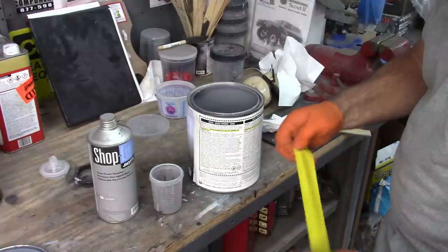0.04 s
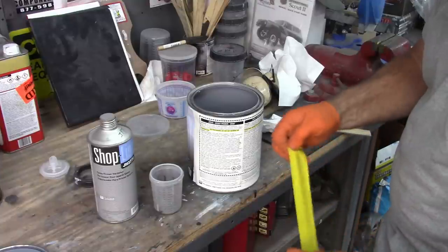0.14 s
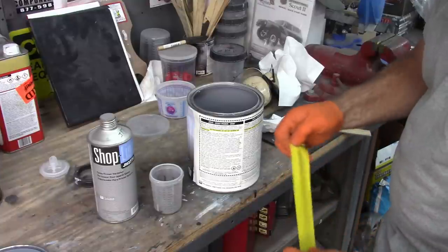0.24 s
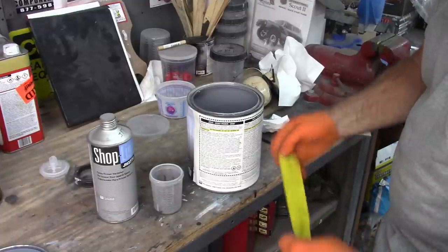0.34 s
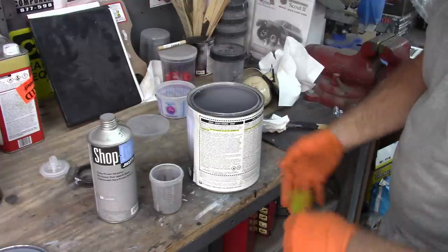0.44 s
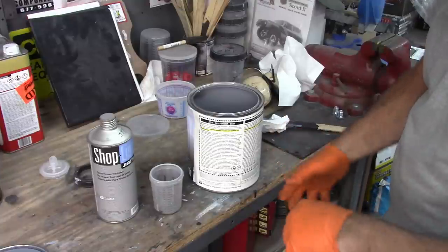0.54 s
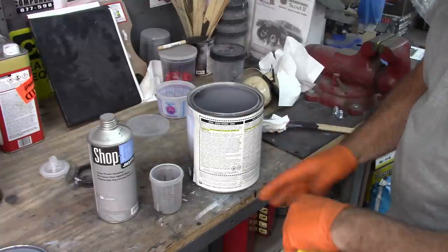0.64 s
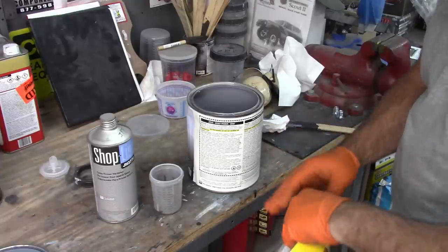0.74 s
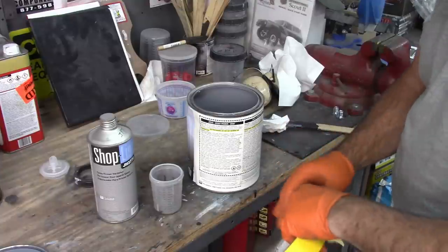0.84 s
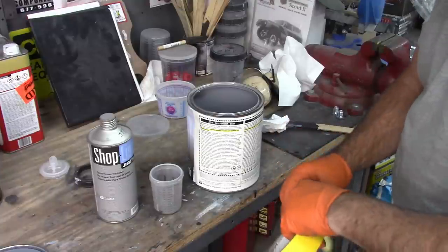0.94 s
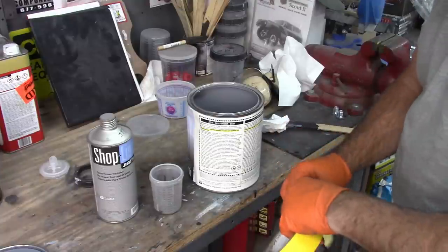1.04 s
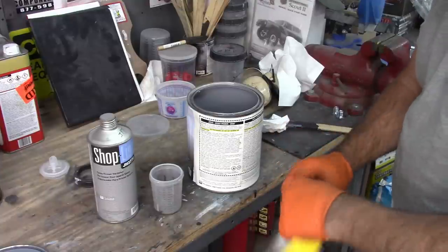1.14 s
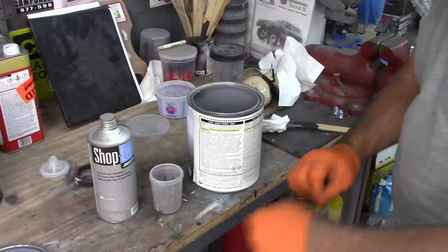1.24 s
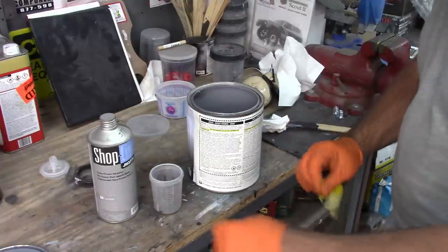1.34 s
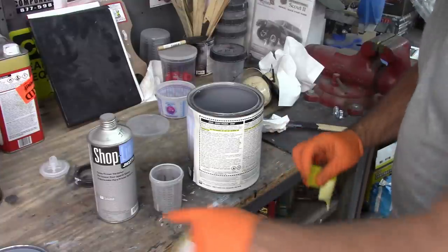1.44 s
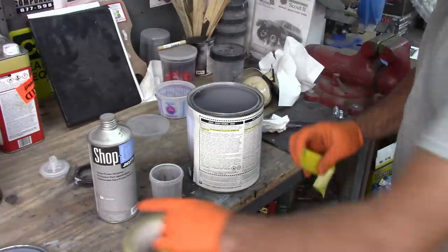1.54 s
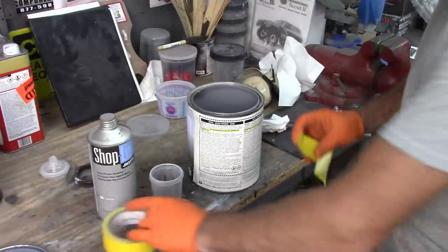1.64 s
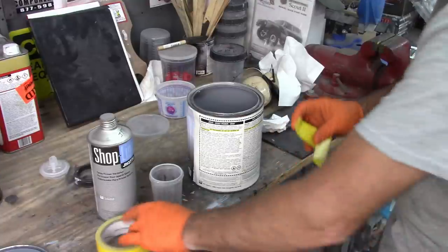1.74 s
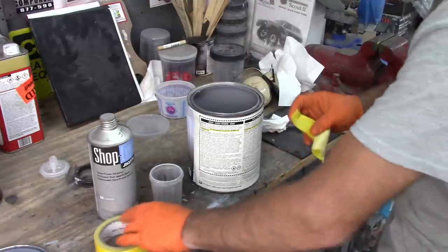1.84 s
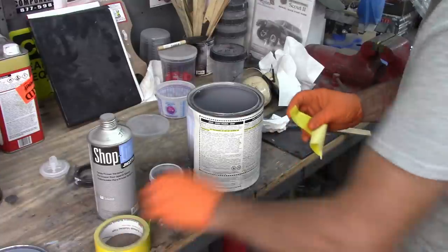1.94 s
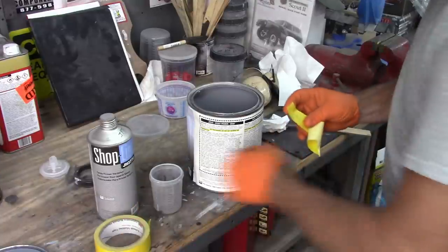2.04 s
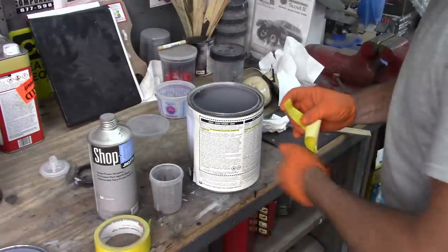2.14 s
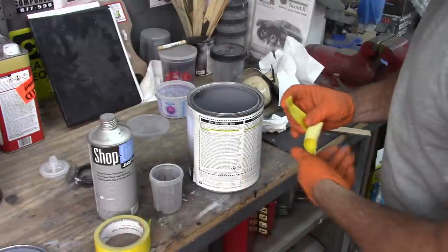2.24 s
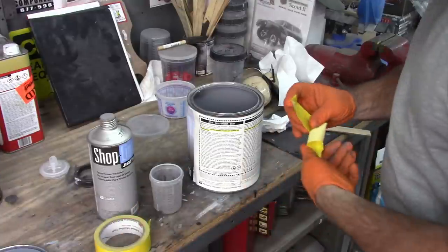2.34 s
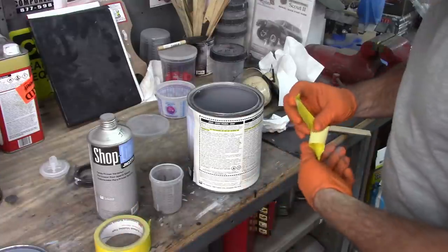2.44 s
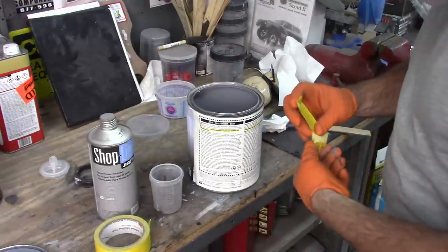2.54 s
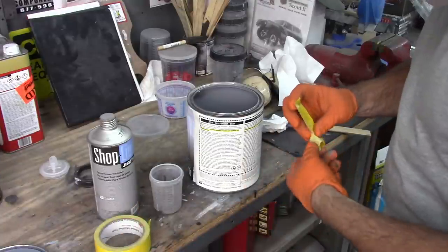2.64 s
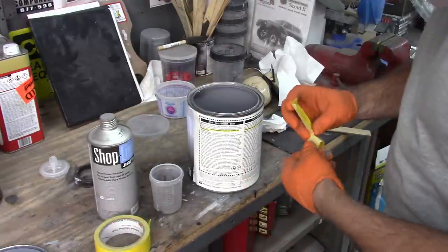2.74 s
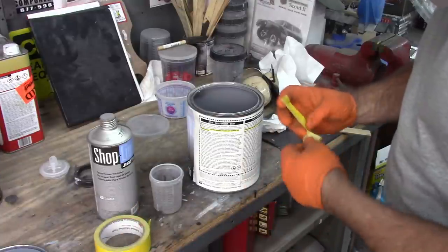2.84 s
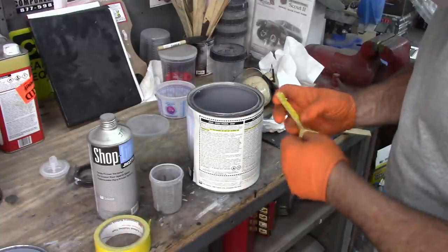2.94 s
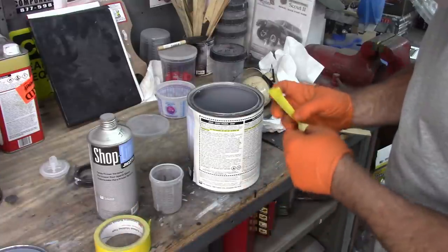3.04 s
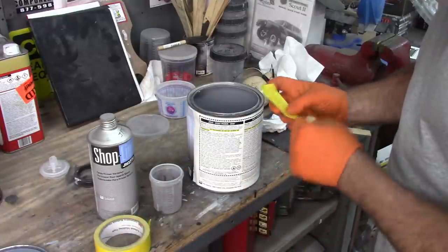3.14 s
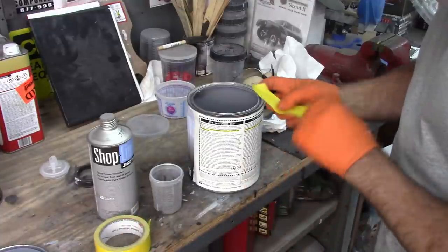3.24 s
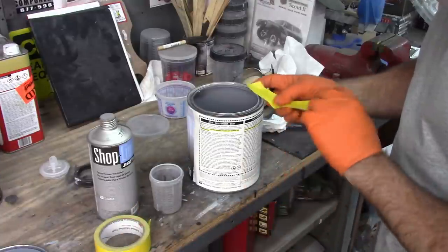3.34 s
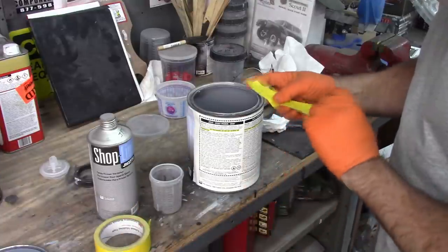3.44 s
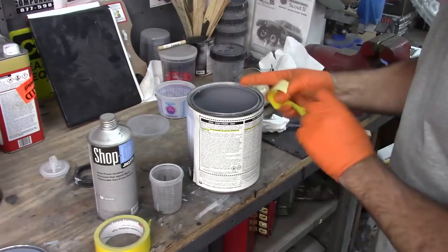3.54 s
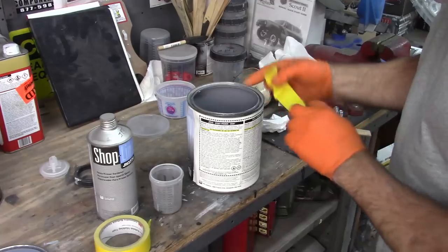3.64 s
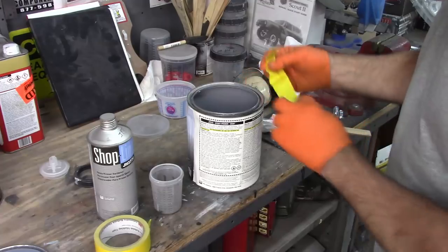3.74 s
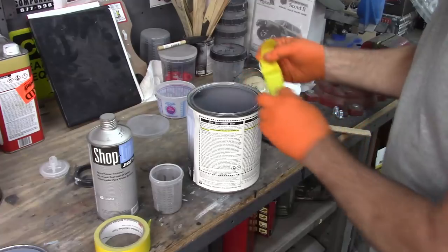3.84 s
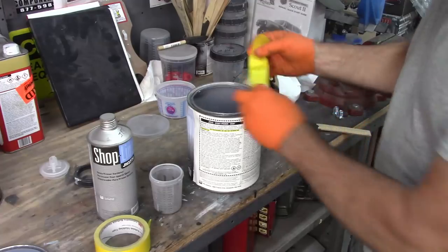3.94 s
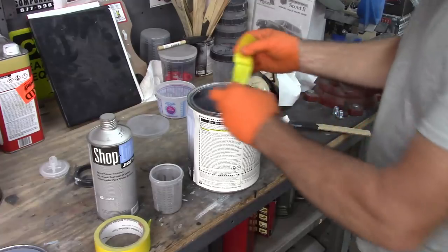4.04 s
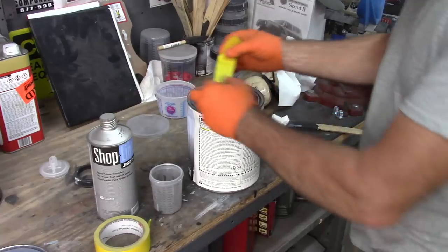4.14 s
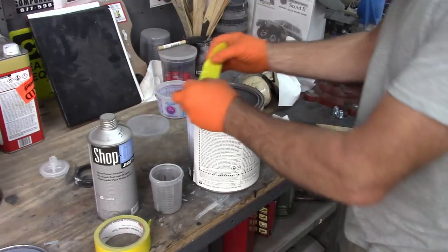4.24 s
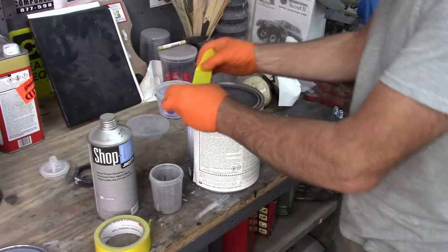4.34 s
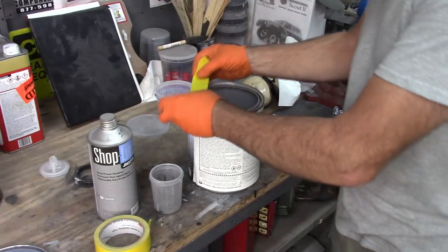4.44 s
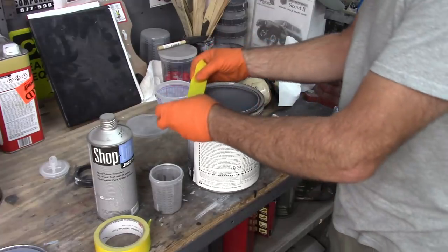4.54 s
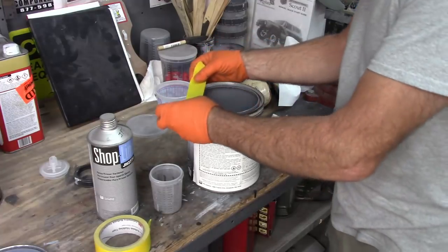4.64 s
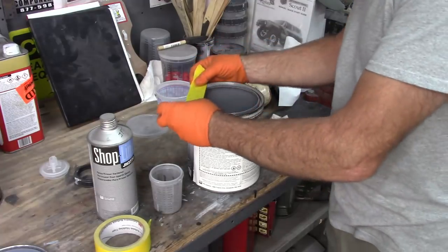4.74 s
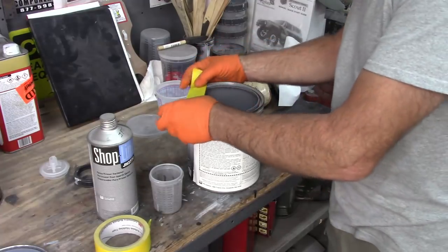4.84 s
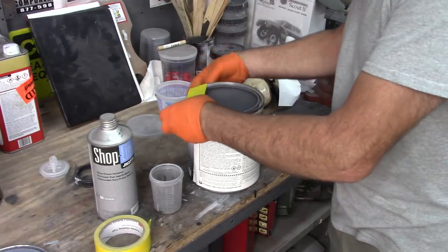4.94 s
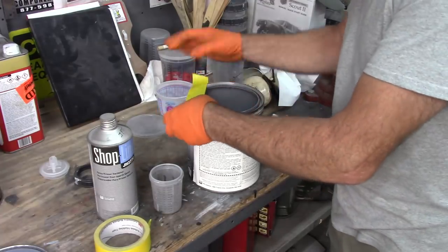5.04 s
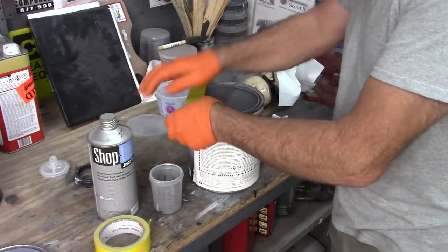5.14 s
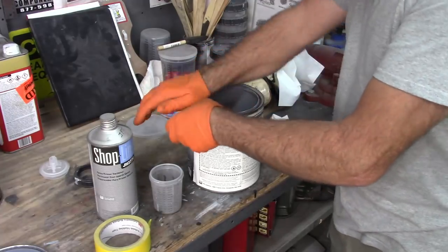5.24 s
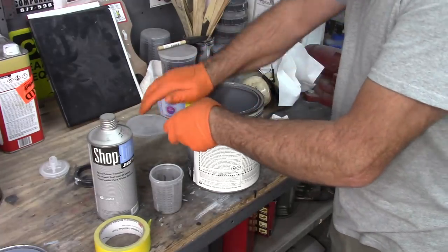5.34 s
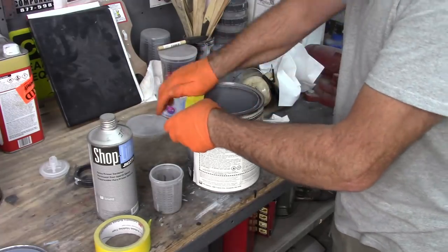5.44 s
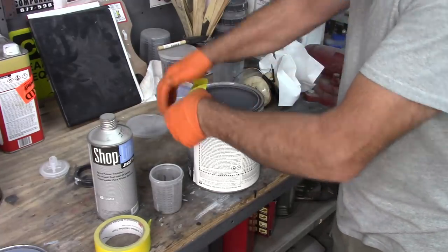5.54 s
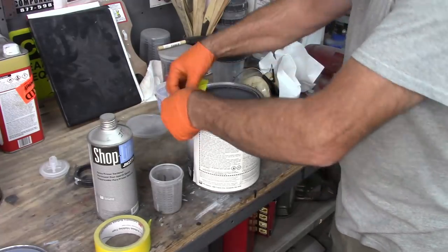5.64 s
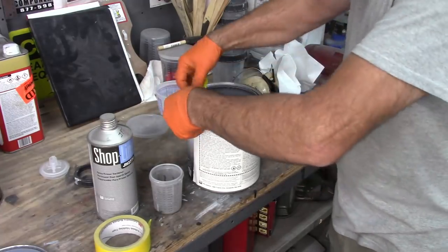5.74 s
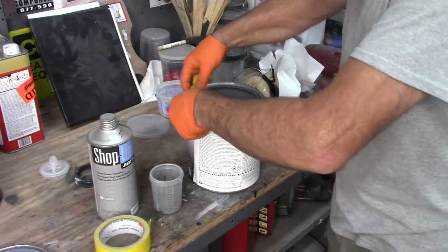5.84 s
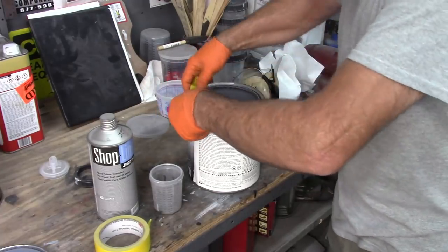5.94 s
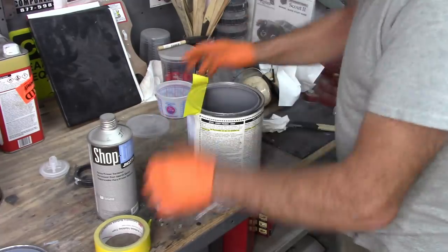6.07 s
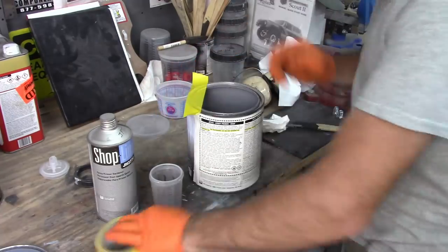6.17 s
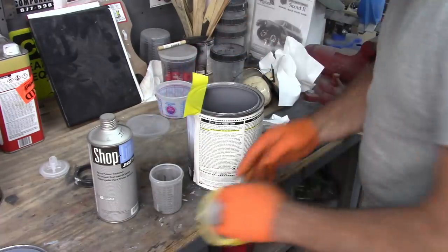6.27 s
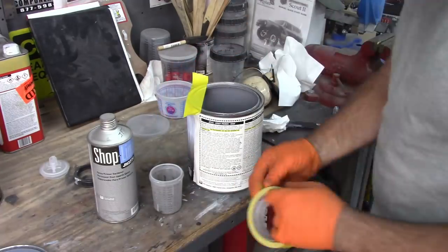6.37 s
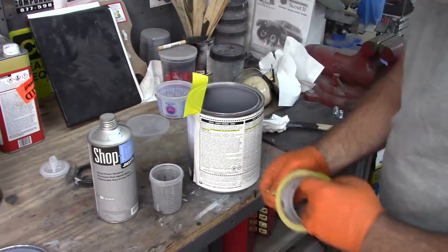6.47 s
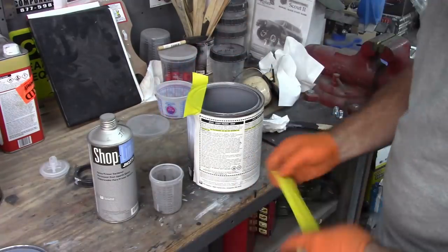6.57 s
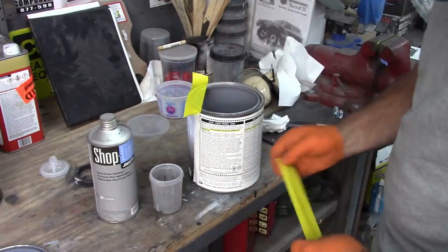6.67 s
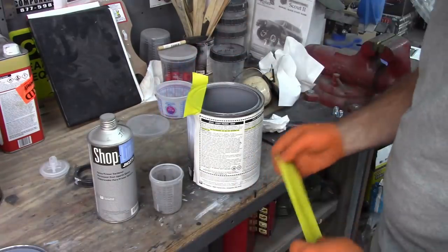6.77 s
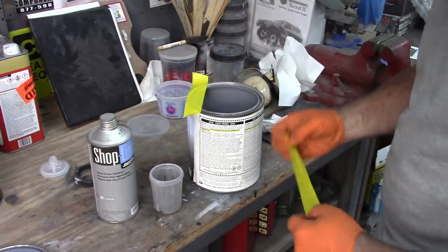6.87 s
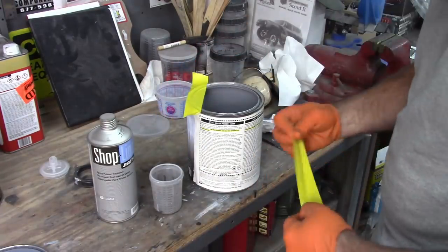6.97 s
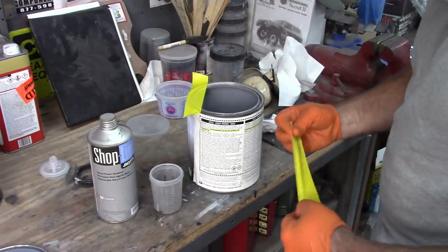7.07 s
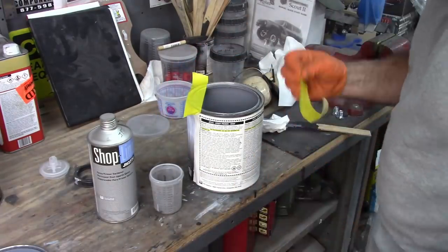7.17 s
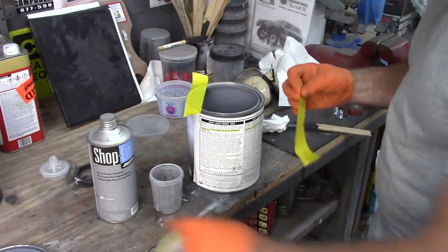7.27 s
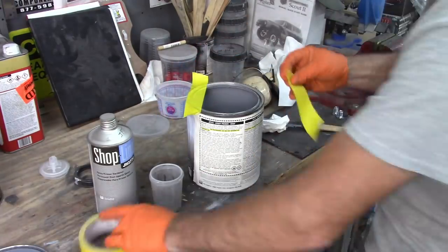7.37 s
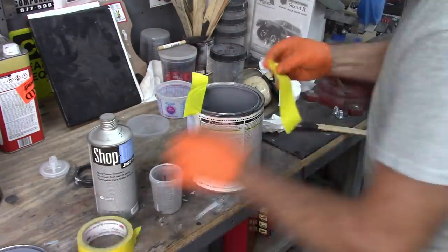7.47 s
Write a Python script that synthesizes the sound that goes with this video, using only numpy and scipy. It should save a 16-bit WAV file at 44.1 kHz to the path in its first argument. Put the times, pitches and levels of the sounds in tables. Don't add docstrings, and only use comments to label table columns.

```python
import sys
import numpy as np
from scipy import signal
from scipy.fft import rfft, irfft, next_fast_len
from scipy.io import wavfile
from scipy.ndimage import uniform_filter1d, map_coordinates

SR = 44100
rng = np.random.default_rng(int(sys.argv[2]) if len(sys.argv) > 2 else 0)


def gain_from_db(level_db):
    decades = np.asarray(level_db, float) / 20
    return 10 ** decades


def persist_wave(psi):
    counts = np.round(np.clip(psi, -1, 1) * 32767).astype(np.int16)
    wavfile.write(sys.argv[1], SR, np.atleast_2d(counts).T)


N = 331191

# pitch_hz, level_db (per Hz)
PAPER = [(590, -34.5), (1000, -6.5), (1180, 1.5), (1450, -5.5), (1990, 2.5), (4650, -10.5), (5000, -25.5),
         (6500, -39.5), (11000, -120)]
# pitch_hz, level_db (per Hz)
LOOSE_STRIP = [(590, -37.5), (1000, -4.5), (1270, -16.5), (1630, -7.5), (2380, -4.5), (2820, -3.5),
               (3800, -7), (5000, -14.5), (6500, -36.5), (11000, -120)]
# pitch_hz, level_db (per Hz)
GLUE_HISS = [(2820, -51), (5000, -15.5), (5800, -1), (6780, -1), (8580, -3), (12500, -14.5), (14800, -20),
             (15900, -25.5)]
# pitch_hz, level_db (per Hz)
GLOVE = [(590, -31), (1000, -0.5), (1120, -4.5), (1740, -2.5), (1930, -4), (2710, -5.5), (3790, -9),
         (5170, -10), (8320, -14), (14800, -28), (15900, -33)]
ROUND, PEAKED, FLAT = 1.9, 0.88, 8.3
CRACK_DRUM_DB, TUG_DRUM_DB, YANK_DRUM_DB = -30, -12, -3


def pulls():
    # peak_s, paper_level_db, rise_s and fall_s (over 20 dB), dryness_db
    pull_strokes = [
        (.041, -20.5, 1, 0.0624, -10),
        (6.626, -17.5, 0.024, 0.0254, -2.5),
        (6.736, -19.5, 0.0152, 0.0339, -5),
        (6.839, -27.5, 0.0231, 0.0332, -1),
        (7.224, -30, 0.0215, 0.0267, -2),
    ]
    # pitch_hz, width_hz, level_db
    lowest_tones = [(187.5, 13, 10), (340, 57, 4), (253.4, 25, 3.5), (254, 37, 6), (455, 110, 4.5)]
    # pitch_hz, width_hz, level_db
    higher_tones = [
        [(1210, 110, 7.5), (1950, 140, 3)],
        [(1200, 90, 3), (2330, 740, 3.5)],
        [(750, 150, 2.5), (1340, 80, 2.5)],
        [(1060, 200, 3), (2540, 280, -0.5)],
        [(2000, 270, -6), (1000, 140, -9.5)],
    ]
    tauten_s = [0, 0.01, 0, 0, 0]
    return peels(pull_strokes, PAPER, share=.2, clump_db=1.9, drum_db=-12, bend=ROUND, curl_db=-9,
                 tones=lowest_tones, overtones=higher_tones, late_s=tauten_s)


def slips():
    # start_s, peak_level_db
    jerks = [(.002, -9.5), (.0072, -9.5), (.0095, -6.5), (0.0148, -4.5), (.023, -8.5), (0.031, -7.5),
             (.038, -12), (0.042, -11.5), (.049, -10), (0.0542, -12.5), (.058, -8.5), (0.0612, -10.5),
             (0.065, -13), (.070, -12), (0.0779, -9.5)]
    s, db = np.transpose(jerks)
    taut = 1 - ((s - 0.039) / 0.03) ** 2
    paper_db, drum_db = -13.5 + 6.5 * taut, -18.5 + 9 * taut
    return snaps(zip(s, db, paper_db, drum_db), PAPER, lift_db=0.0, fizz=0.59, fizz_t60=0.012,
                 ring_db=-8.5, top_hz=30000)


def flicks():
    # peak_s, paper_level_db, rise_s and fall_s (over 20 dB), dryness_db
    flick_strokes = [(.456, -38.5, 0.076, .09, -3.5), (2.456, -48, 0.051, 0.1, -4),
                     (2.658, -44.5, .04, 0.017, -5.5), (2.836, -43, 0.012, 0.039, 0),
                     (2.97, -46.5, .04, .15, -1.2), (3.106, -37, .005, .04, 2.5),
                     (3.26, -44.5, .012, .03, 1.15), (3.478, -39.5, .045, .06, 0.8),
                     (4.084, -45, .012, .025, 2), (4.34, -47, 0.0267, 0.046, -0.5),
                     (7.393, -43, .035, 0.022, 1)]
    return peels(flick_strokes, LOOSE_STRIP, share=.2, clump_db=1.3, drum_db=-9.5, bend=PEAKED, curl_db=6)


def stretches():
    # peak_s, paper_level_db, rise_s and fall_s (over 20 dB), dryness_db
    stretch_strokes = [(.222, -41, 0.12, .022, -0.15), (.29, -56, 0.063, .03, 3),
                       (1.036, -61, 0.032, .25, -9), (1.265, -45, 0.038, 0.061, -3.5),
                       (1.385, -51.5, 0.0792, .04, 1), (1.42, -43.5, .04, .025, 1.7),
                       (1.56, -49.5, .08, .021, 2), (1.87, -63, .04, .025, 6), (3.07, -53, 0.04, 0.029, 0),
                       (3.15, -49.5, 0.044, 0.07, -3), (3.31, -47, .06, 0.16, -2.3),
                       (3.53, -51.5, 0.056, 0.12, -2), (3.705, -47, 0.099, 0.056, -2),
                       (6.48, -61, 0.065, .04, -6.5), (6.548, -47, .04, 0.041, -0.9),
                       (7.322, -58.5, 0.024, 0.042, 1.5)]
    return peels(stretch_strokes, LOOSE_STRIP, share=0.17, clump_db=1.6, drum_db=-8.5, bend=ROUND,
                 curl_db=2.8, tones=[(183.5, 18, 13)])


def tear():
    # peak_s, paper_level_db, rise_s and fall_s (over 20 dB), dryness_db
    tear_stroke = [(1.22, -29.5, .027, .021, -2.2)]
    # pitch_hz, level_db (per Hz)
    torn_sheet = [(350, -38.5), (600, -5), (1140, -8.5), (1560, -4), (2770, -1.5), (3430, -11.5),
                  (5110, -9.5), (5500, -7.5), (7150, -37), (12100, -120)]
    return peels(tear_stroke, torn_sheet, share=0.29, clump_db=1.5, drum_db=-12.5, bend=FLAT,
                 curl_db=3, tones=[(304, 60, -3.5)])


def rubs():
    # peak_s, paper_level_db, rise_s and fall_s (over 20 dB), dryness_db
    rub_strokes = [(4.902, -44, 0.02, 0.024, -1.5), (5.055, -56.5, 0.023, 0.014, 5.5),
                   (5.35, -59, 0.062, 0.047, -9.5), (5.43, -50, 0.058, 0.093, -6.5),
                   (5.61, -60.5, 0.037, .03, -5.5), (5.694, -63.5, .013, 0.046, -2.5),
                   (5.774, -54, 0.031, 0.051, -9), (6.071, -57, 0.012, 0.031, -10),
                   (6.12, -65, 0.042, 0.106, -6), (6.336, -67.5, 0.067, 0.052, 2.5),
                   (7.0, -52, 0.025, 0.025, -12.5), (7.105, -67.5, 0.0151, 0.027, -1)]
    # pitch_hz, level_db (per Hz)
    can_sheet = [(590, -32), (1000, -12), (2010, -1.5), (2230, -5), (3250, -3), (4060, -13), (5000, -15),
                 (6500, -37), (11000, -120)]
    return peels(rub_strokes, can_sheet, share=0.26, clump_db=0.9, drum_db=-9.5, bend=ROUND, curl_db=-9)


def glue_snaps():
    # start_s, peak_level_db, paper_level_db
    cracks = [(0.4606, -13, -12), (1.423, -15.5, -15), (2.4183, -29, -18.5), (2.4491, -16, -12),
              (2.8253, -33.5, -5), (2.8347, -21, -10.5), (2.8494, -22, -14.5), (2.9726, -30, -13.5),
              (2.9766, -14.5, -19.5), (2.9816, -22, -12), (3.097, -32, -10.5), (3.1027, -16.5, -10.5),
              (3.1057, -12, -18.5), (3.1079, -14, -18.5), (3.112, -19.5, -9), (3.1177, -21.5, -15),
              (3.012, -37, -24), (3.652, -29, -21), (1.374, -32.5, -13), (1.549, -30, -18),
              (1.552, -32, -14), (3.6009, -30, -12), (3.6283, -27, -14), (4.0722, -34, -35),
              (7.3642, -36.5, -10)]
    # start_s, peak_level_db, paper_level_db
    tugs = [(0.702, -44, -4), (1.189, -28, -6.5), (1.194, -35.5, 1), (1.2017, -25.5, -5.5),
            (1.4656, -23, -12), (2.213, -42, -11.5), (2.25, -42.5, -17), (2.4436, -20.5, -15),
            (3.2553, -34, -7.5), (3.3618, -30, -25), (3.786, -44, -12), (4.0821, -30, -14.5),
            (4.1881, -32, -13.5), (5.021, -34, -15), (6.422, -45.5, -10.5), (6.8438, -13.5, -13.5),
            (7.283, -42.5, -6.5), (7.3889, -26.5, -1.86)]
    # start_s, peak_level_db, paper_level_db
    yanks = [(2.5136, -41.5, 0), (2.6862, -31, -4), (3.278, -39.5, -3)]
    events = [(*row, CRACK_DRUM_DB) for row in cracks]
    events += [(*row, TUG_DRUM_DB) for row in tugs]
    events += [(*row, YANK_DRUM_DB) for row in yanks]
    sound = snaps(events, LOOSE_STRIP, lift_db=6.0, fizz=0.13, fizz_t60=0.024, ring_db=13.5, top_hz=11700)
    return np.roll(sound, SR // 1000)


def pings():
    # start_s, peak_level_db, paper_level_db
    small_cracks = [(1.093, -53, -1), (1.152, -55, -3), (1.9764, -46, -10), (2.044, -29.5, -14.5),
                    (2.0993, -26, -14), (2.1687, -39.5, -20), (3.2343, -42, -4), (3.4766, -4, -18.5),
                    (3.82, -34, -23), (3.946, -36, -20)]
    events = [(*row, CRACK_DRUM_DB) for row in small_cracks]
    sound = snaps(events, LOOSE_STRIP, lift_db=7.0, fizz=.05, fizz_t60=0.01, ring_db=26, top_hz=12150)
    return np.roll(sound, SR // 1000)


def peels(strokes, sheet, share, clump_db, drum_db, bend, curl_db, tones=(), overtones=(), late_s=()):
    # pitch_hz, gain
    tone_band = [(90, 0), (150, 1), (450, 1), (900, 0)]
    edge = threads(share, spread_db=2, clump_db=clump_db)
    body = unit(edge + threads(share, spread_db=2, clump_db=clump_db))
    levels = [stroke(*row, drum_db, bend) for row in strokes]
    for level, s in zip(levels, late_s):
        level[2] = np.roll(level[2], round(s * SR))
    gains = sum(levels) * gain_from_db([[-2.2], [-.7], [-2.2]])
    gains = np.abs(uniform_filter1d(gains, size=200, axis=1))
    paper, hiss, drum = gains[0] * body, gains[1] * edge, gains[2] * body

    twang = np.zeros(N)
    for level, tone in zip(levels, tones):
        twang += filtered(gain_from_db(13) * level[2] * body, modes([tone]))
    twang = filtered(twang, lambda hz: along(tone_band, hz))
    sung = np.zeros(N)
    for level, pair in zip(levels, overtones):
        sung += filtered(gain_from_db(3) * level[0] * body, modes(pair))
    return voiced(paper, hiss, drum, sheet) + twang + sung + gain_from_db(curl_db) * curled(paper)


def stroke(s, db, rise_s, fall_s, dry_db, drum_db, bend):
    gains = np.zeros((3, N))
    first = max(int((s - 4 * rise_s) * SR), 0)
    last = min(int((s + 4 * fall_s) * SR), N)
    t = np.arange(first, last) / SR - s
    under_db = -20 * np.where(t < 0, -t / rise_s, t / fall_s) ** bend
    hiss_db = 1.2 * under_db + dry_db
    strip_db = 0.99 * under_db + drum_db - 0.58 * dry_db
    gains[:, first:last] = gain_from_db(db + np.array([under_db, hiss_db, strip_db]))
    return gains


def snaps(events, sheet, lift_db, fizz, fizz_t60, ring_db, top_hz):
    kicks, t = np.zeros((3, N + SR)), np.arange(SR // 20) / SR
    for s, db, paper_db, drum_db in events:
        burst = fizz * rng.standard_normal(len(t)) * gain_from_db(-60 * t / fizz_t60)
        burst[0] = -1
        levels_db = np.array([[db + paper_db + 8.5], [db], [db + drum_db + 8.5]]) + lift_db
        start = round(s * SR)
        kicks[:, start:start + len(t)] += gain_from_db(levels_db) * burst
    kicks = filtered(kicks[:, :N], lambda hz: 1 / (1 + 1j * hz / top_hz) ** 2)
    return voiced(*kicks, sheet) + gain_from_db(ring_db) * curled(kicks[0])


def threads(share, spread_db, clump_db):
    kicks = (rng.random(N) < share) * rng.standard_normal(N) * gain_from_db(spread_db * rng.standard_normal(N))
    return unit(kicks * gain_from_db(clump_db * wobble(220)))


def voiced(paper, hiss, drum, sheet):
    # pitch_hz, level_db (per Hz)
    drum_skin = [(88, -53), (150, -21), (304, -2.5), (609, -2.5), (757, -2), (901, -8.5), (1200, -1),
                 (1560, -27.5), (2640, -120)]
    return struck(paper, sheet) + struck(hiss, GLUE_HISS) + struck(drum, drum_skin)


def curled(x):
    # time_s, pitch_hz
    curl_pitch = [(1, 2800), (1.5, 2700), (2.045, 2800), (2.1, 2520), (2.45, 2900), (2.7, 2800),
                  (2.83, 3200), (2.98, 3000), (3.1, 3300), (3.24, 2900), (3.476, 3300), (3.53, 3698),
                  (3.7, 3000), (4.1, 2900), (7.3, 2900)]
    turn = np.exp(2j * np.pi * np.cumsum(curves(curl_pitch)[0]) / SR)
    keep = np.exp(-np.pi * 260 / SR)
    return 2 * np.real(turn * signal.lfilter([1 - keep], [1, -keep], x / turn))


def drops():
    # start_s, level_db, contact_ms
    contacts = [(1.7541, 2.5, .045), (1.7554, -4.5, 0.043), (1.7590, -6, .07), (1.765, -15.5, .08),
                (1.777, -10.5, .07), (1.783, -18, .09), (1.790, -15, .08), (1.805, -16.5, .08),
                (1.817, -18.5, .08), (7.4755, -42, .1), (7.4795, -22, 0.033), (7.482, -26, .06),
                (7.485, -26.5, .07), (7.4872, -22, .06), (7.4905, -27.5, .06), (7.4932, -15.5, .06),
                (7.497, -13, .06), (7.5005, -14.5, .06), (7.5045, -25, .06), (7.508, -18, .05)]
    # pitch_hz, width_hz, level_db
    bench_modes = [(239, 73, -16), (375, 90, -8), (550, 210, -10), (668, 64, -1), (883, 73, -1),
                   (1035, 92, -2.5), (1420, 300, -5.5), (1710, 330, -5.5), (2130, 700, -11.5),
                   (3300, 1500, -22)]
    # pitch_hz, width_hz, level_db
    plank_modes = [(95, 46, -27.5), (364, 26, -14), (700, 26, -14), (886, 18, -10.5)]
    scuff_db, scuff_t60 = -34.5, 0.057
    blows, scuffs, t = np.zeros(N + SR), np.zeros(N + SR), np.arange(SR // 20) / SR
    for s, db, contact_ms in contacts:
        u = 1000 * t / contact_ms
        start = round(s * SR)
        blows[start:start + len(t)] += gain_from_db(db + 26.5) * u * np.exp(-u)
        fade = gain_from_db(db + scuff_db - 60 * t / scuff_t60)
        scuffs[start:start + len(t)] += fade * rng.standard_normal(len(t))
    bench, planks = modes(bench_modes), modes(plank_modes)
    wood = filtered(blows[:N], lambda hz: (bench(hz) + planks(hz)) * above(hz, corner_hz=60))
    return wood + struck(scuffs[:N], GLOVE)[:N]


def gloves():
    # time_s, level_db
    hand_motion = [(0, -64), (.08, -35), (.21, -58), (1.09, -68), (1.4, -54.5), (1.59, -62), (1.92, -61.5),
                   (2.3, -63.5), (3.51, -57.5), (3.76, -64.5), (4.0, -60), (4.77, -68.5), (6.4, -70),
                   (6.57, -63), (6.71, -73), (7.46, -71.5), (7.51, -54.5)]
    level = gain_from_db(curves(hand_motion)[0] + 0.84 + 0.76 * wobble(14) + 3.3 * wobble(72))
    held = np.interp(np.arange(N) / SR, [.9, 1.2, 3.8, 4.3], [.15, 1, 1, .15])
    ticks = struck(threads(share=.02, spread_db=3, clump_db=3), GLUE_HISS[:5] + [(16000, -50)])
    curl = unit(curled(threads(share=.05, spread_db=3, clump_db=4)) * gain_from_db(3 * wobble(14)))
    return level * (rush(GLOVE, patchy_db=.8) + held * (gain_from_db(-8) * ticks + gain_from_db(-4.5) * curl))


def swish():
    # time_s, level_db
    drag = [(3.82, -84), (3.88, -65.5), (4.18, -67), (4.24, -77.5)]
    # pitch_hz, width_hz, level_db
    rim_mode = [(1870, 160, 0)]
    hiss = filtered(rng.standard_normal(N), lambda hz: modes(rim_mode)(hz) ** 2)
    return gain_from_db(curves(drag, outside=-99)[0]) * unit(hiss)


def air():
    # time_s, level_db
    arm_swing = [(0, -56.5), (.08, -48), (.21, -62.5), (1.09, -61.5), (1.4, -64.5), (1.59, -57.5),
                 (1.92, -57.5), (2.22, -64), (3.51, -59), (3.76, -61.5), (4.0, -56.5), (4.5, -63.5),
                 (6.4, -66.5), (6.57, -58.5), (6.71, -69), (7.38, -70), (7.51, -65)]
    # pitch_hz, level_db (per Hz)
    sleeve_cloth = [(140, -33.5), (240, -12), (350, 0), (392, -5), (428, 3.5), (576, -3.5), (705, -3),
                    (1200, -17), (1560, -40), (2640, -120)]
    # pitch_hz, level_db (per Hz)
    building = [(12, -49.5), (20, -24.5), (43, -24), (58, -15), (70, -7.5), (82, -4.5), (101, -8),
                (134, -3), (178, -4), (280, -1.5), (360, -25.5), (620, -120)]
    t = np.arange(N) / SR
    sleeve_db, = curves(arm_swing)
    sleeves = gain_from_db(sleeve_db + 1.0 + 0.88 * wobble(9) + 2.6 * wobble(25)) * rush(sleeve_cloth, patchy_db=1.5)
    running_db = np.interp(t, [1.8, 2.1, 4.6, 4.9], [-82, -75, -76, -86])
    motor_hz = 76 + 2 * wobble(6)
    motor = gain_from_db(running_db + 2 * wobble(4)) * np.sin(2 * np.pi * np.cumsum(motor_hz) / SR)
    rumble = gain_from_db(-66.5 + 0.77 * (sleeve_db + 62))
    jolt = gain_from_db(-41.5 - 60 * t / 0.076)
    return sleeves + motor + (rumble + jolt) * rush(building, patchy_db=2.0)


def garage(x, early_db, late_db, dull_hz):
    # delay_s, level_db
    wall_echoes = [(.0037, -14), (.0055, -13.5), (.0085, -21), (0.014, -26.5), (.023, -32.5)]
    # pitch_hz, t60_s
    decay_times = [(150, 0.71), (500, 0.27), (1500, 0.3), (4000, 0.32), (10000, 0.23)]
    hz, t, z = signal.stft(rng.standard_normal(SR * 3 // 4), SR, nperseg=256)
    hz = hz[:, None]
    fade = gain_from_db(-60 * t / along(decay_times, hz))
    tail = signal.istft(z / (1 + (hz / dull_hz) ** 2) * fade, SR, nperseg=256)[1]
    answer = np.pad(gain_from_db(late_db) * tail / np.linalg.norm(tail), (SR // 200, 0))
    answer[0] = 1
    for s, db in wall_echoes:
        answer[round(s * SR)] += gain_from_db(early_db + db)
    return signal.fftconvolve(x, answer)[:N]


def ports(x, side_db, size):
    z = signal.stft(x, nperseg=size)[2]
    scattered = signal.istft(z * np.exp(2j * np.pi * rng.random(z.shape)), nperseg=size)[1][:N]
    scattered = filtered(scattered, lambda hz: above(hz, 3 * SR / size / 2))
    side = gain_from_db(side_db) * unit(scattered) * np.std(x)
    return np.array([x + side, x - side])


def rush(spectrum, patchy_db):
    z = signal.stft(rng.standard_normal(N), nperseg=512)[2]
    field = uniform_filter1d(rng.standard_normal(z.shape), 8, 0)
    field = uniform_filter1d(field, 6, 1)
    noise = signal.istft(z * gain_from_db(patchy_db * unit(field)), nperseg=512)[1][:N]
    return unit(filtered(noise, lambda hz: gain_from_db(along(spectrum, hz))))


def struck(x, spectrum):
    size = 2048
    cep = irfft(np.log(gain_from_db(along(spectrum, np.fft.rfftfreq(size, 1 / SR))) + 1e-3))
    cep[1:size // 2] *= 2
    cep[size // 2 + 1:] = 0
    pulse = irfft(np.exp(rfft(cep)))
    return signal.fftconvolve(x, pulse / np.linalg.norm(pulse))[:N]


def modes(table):
    def response(f):
        total = 0
        for k, (centre, width, db) in enumerate(table):
            damping = 1j * f * width
            total = total + (-1) ** k * gain_from_db(db) * damping / (centre * centre - f * f + damping)
        return total
    return response


def above(hz, corner_hz):
    return (1j * hz / (corner_hz + 1j * hz)) ** 2


def filtered(x, response):
    m = next_fast_len(N + SR // 2)
    return irfft(rfft(x, m) * response(np.fft.rfftfreq(m, 1 / SR)), m)[..., :N]


def wobble(rate):
    knots = rng.standard_normal(int(N * rate / SR) + 4)
    return map_coordinates(knots, [np.arange(N) * rate / SR])


def curves(rows, outside=None):
    s, *cols = np.transpose(rows)
    return np.array([np.interp(np.arange(N) / SR, s, c, outside, outside) for c in cols])


def along(points, hz):
    f, v = np.transpose(points)
    return np.interp(np.log(hz + 1), np.log(f + 1), v)


def unit(x):
    return x / np.sqrt(np.mean(x ** 2) + 1e-20)


def scene():
    # time_s, level_db
    near_width = [(0, -31), (.45, -18.5), (.6, -13.5), (1.05, -11), (1.17, -23.5), (1.7, -17), (1.76, -26),
                  (2.1, -17.5), (4.1, -21), (4.5, -9), (5.9, -2.5), (6.45, -5.5), (6.63, -4.5),
                  (6.84, -7.5), (7.25, -2), (7.385, -12.5), (7.5, -2)]
    roll = pulls() + slips()
    strip = flicks() + rubs() + stretches() + tear() + glue_snaps() + pings()
    near = garage(roll, early_db=-3.5, late_db=-22, dull_hz=6960)
    near += garage(strip, early_db=1, late_db=-17.5, dull_hz=8995)
    near += garage(drops(), early_db=-8.5, late_db=-11.0, dull_hz=3000)
    near_db, = curves(near_width)
    murmur_db = 0.1 + 0.57 * near_db
    return ports(near + gloves(), near_db, size=256) + ports(air() + swish(), murmur_db, size=4096)


def top_cut(x):
    return signal.sosfilt(signal.butter(12, 16050, fs=SR, output="sos"), x)


def record(dry):
    held = dry / (1 + np.abs(dry / .9) ** 6) ** (1 / 6)
    mix = filtered(held, lambda hz: hz < 16050)
    return top_cut(mix)


dry = scene()
out = record(dry)
persist_wave(out)
```